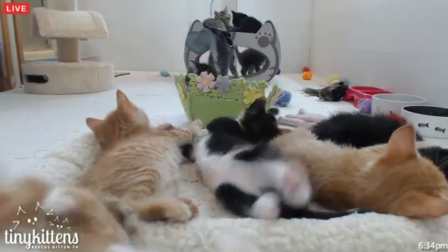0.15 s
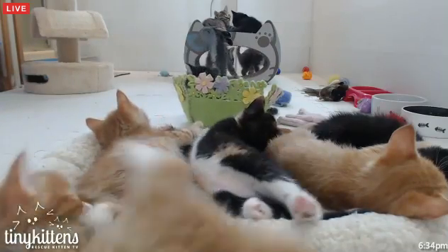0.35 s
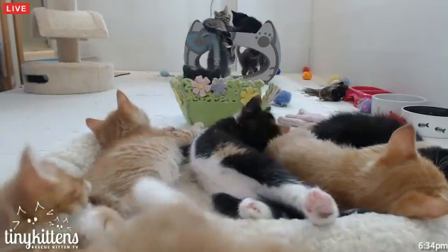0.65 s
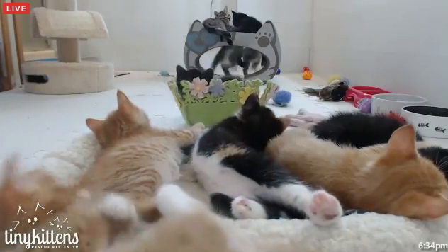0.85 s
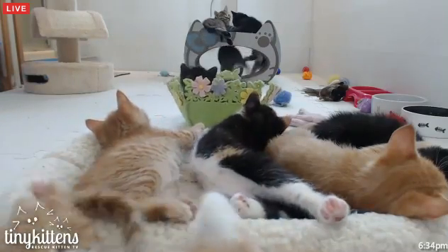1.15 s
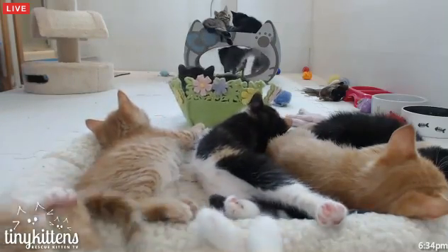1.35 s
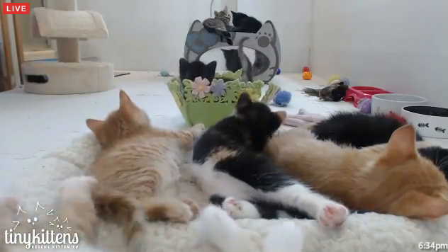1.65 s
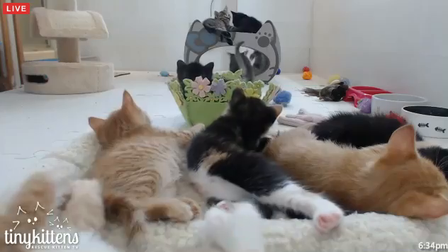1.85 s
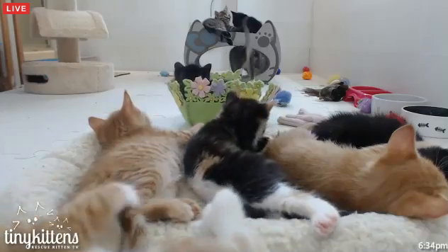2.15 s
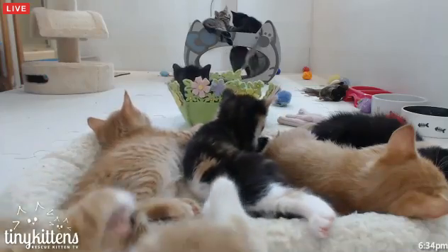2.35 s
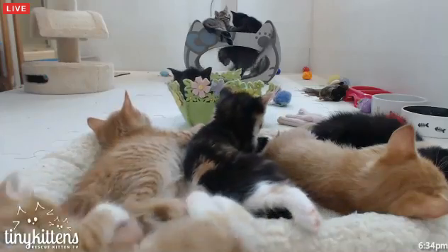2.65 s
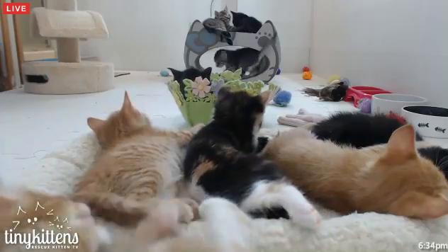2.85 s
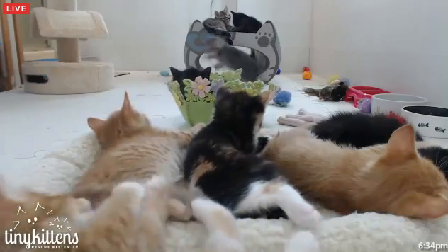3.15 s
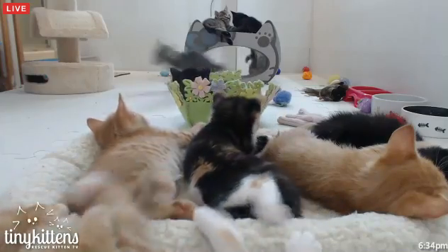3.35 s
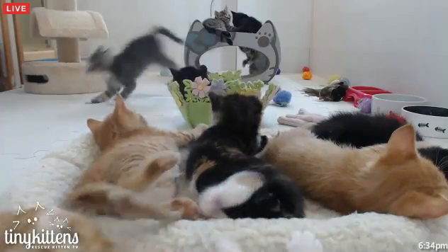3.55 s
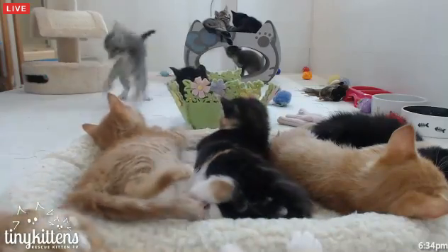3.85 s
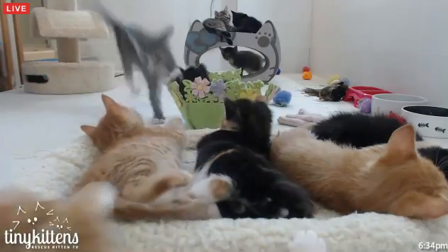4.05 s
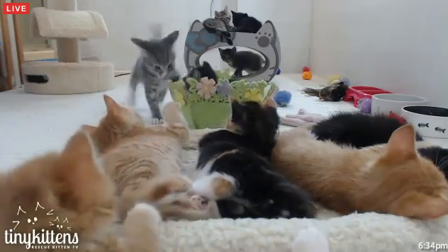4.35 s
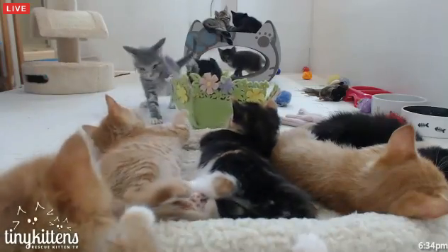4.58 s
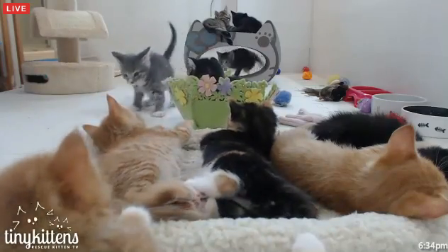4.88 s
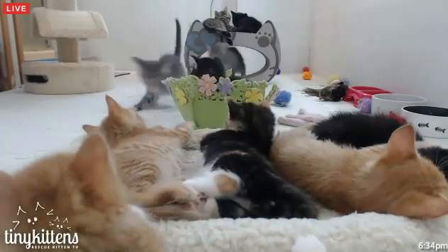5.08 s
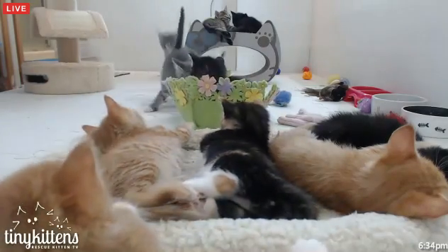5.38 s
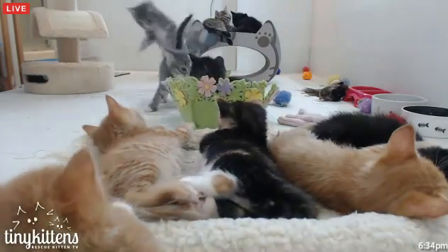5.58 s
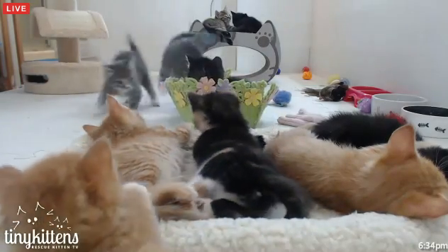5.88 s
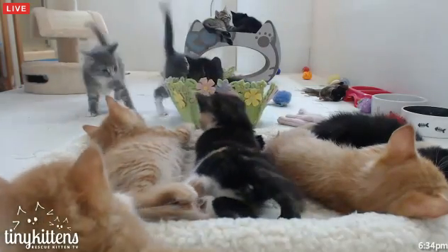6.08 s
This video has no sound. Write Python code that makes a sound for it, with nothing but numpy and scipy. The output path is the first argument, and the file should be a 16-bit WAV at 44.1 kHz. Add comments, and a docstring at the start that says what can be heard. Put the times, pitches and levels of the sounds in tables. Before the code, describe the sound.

A quiet, small, hard-surfaced room: soft air noise, low hum, a very faint high whine and pulsing buzz throughout, with fur stirring on fleece close by. A light paw lands at 0.6 s, followed by a faint scuff. From 0.95 to 1.2 s soft paws knock the microphone housing, dull and hollow, with a hard plastic claw snap at 1.05 and a rustling rub. Light pats come at 1.4 and 1.7. At 1.96 a short crash cracks at the play house; at 2.4 a longer one rattles and scrapes over a bass boom. Close bumps at 2.3, 3.0 and 3.3 lead into galloping thumps, slaps and claw ticks from 3.2 to 4.35, with brief squeaky skids. After a lull, a strong squeaky rub and clustered knocks with low thuds arrive at 4.95 to 5.4. Fur swishes; lighter steps resume, busier from 5.9 to the end, around 6 s.

```python
"""A small hard-floored room where kittens romp, over air noise, hum and a faint electronic whine.
Fur rustles on a blanket (coloured noise with wandering gains); twice something crashes about at the
play house (noise bursts, rattled modes). Another kitten bounds and skids over the floor (bursts of
noise, pitched squeaks). Nearest, one wrestles against the camera: soft presses ring the dull modes
of its housing and rock its stand, and one claw snaps on the shell."""
import sys
import numpy as np
from scipy import signal
from scipy.fft import rfft, irfft
from scipy.io import wavfile

SR = 44100
rng = np.random.default_rng(int(sys.argv[2]) if len(sys.argv) > 2 else 0)


def bounce(signal):
    """Save signal as a 16-bit WAV file at the path given by the first command-line argument."""
    frames = np.transpose(np.atleast_2d(signal))
    limited = np.clip(frames, -1, 1)
    pcm = np.round(limited * 32767).astype(np.int16)
    wavfile.write(sys.argv[1], SR, pcm)


N = 274302

# Soft paws against the camera; the levels are relative, before each layer's trim:
# start_s, ring_db, ring_hz, contact_s, shudder_db
CAMERA_BUMPS = [(.943, -18, 344, 0.0097, -21), (1.068, -20.5, 357, 0.025, -37),
                (1.112, -24.5, 380, 0.014, -16), (1.152, -18, 352, 0.014, -20),
                (2.273, -20, 361, .012, -28), (2.997, -13.5, 368.4, .017, -29.5),
                (3.279, -18.5, 350.4, 0.012, -27.5), (4.926, -25.5, 397, .007, -26),
                (4.939, -18.5, 385, 0.0063, -16.5), (4.961, -11.5, 395, 0.01, -35),
                (5.170, -13.5, 469, 0.0026, -5), (5.179, -15, 419, 0.0078, -33),
                (5.229, -14, 365, 0.015, -20.5), (5.345, -30.5, 380, 0.0098, -32),
                (5.413, -28.5, 402, 0.0053, -29)]
# Colour of a pad's slap: frequency_hz, density_db (relative, per Hz)
PAD_COLOUR = [(120, -42), (280, -5), (410, 6), (600, -6), (850, -8.5), (1200, -21), (1900, -24),
              (3500, -70)]
# Colour of claws ticking: frequency_hz, density_db (relative, per Hz)
CLAW_COLOUR = [(600, 2), (1400, 5), (2200, 1.5), (3300, 9), (4500, -1), (6400, -8), (8000, -20),
               (10000, -13.5), (13000, -18), (14500, -47)]
# Colour of a dull body rub: frequency_hz, density_db (relative, per Hz)
RUB_COLOUR = [(60, 5.5), (160, 1), (250, 2), (370, -2.5), (560, -7), (900, -12.5), (1200, -24.5),
              (2000, -30.5), (4000, -63)]
# Colour of swishing fur: frequency_hz, density_db (relative, per Hz)
SWISH_COLOUR = [(700, 7), (1500, 2.5), (2200, 1), (3200, 2), (4500, -3.5), (6300, -6.5), (8000, -15.5),
                (10000, -14.5), (13000, -23), (14500, -37)]


def amp(db):
    """Decibels to gain."""
    return 10 ** (np.asarray(db) / 20)


def evened(x):
    """Scales to rms 1."""
    return x / np.sqrt(np.mean(x ** 2) + 1e-20)


def read(points, hz):
    """Reads a table of (frequency, value) on a log-frequency axis."""
    table_hz, value = np.transpose(points)
    return np.interp(np.log(hz + 1), np.log(table_hz + 1), value)


def add(mix, start_s, sound):
    """Mixes a sound in at its start time, cut off at the end of the mix."""
    part = mix[:, round(start_s * SR):][:, :sound.shape[-1]]
    part += sound[..., :part.shape[1]]


def noise(colour, size):
    """Coloured noise at two close microphones, alike in the bass and less so in the treble."""
    # likeness of the two microphones: frequency_hz, correlation (0 to 1)
    likeness = [(30, 0.97), (120, .98), (500, 0.98), (1200, 0.84), (3000, 0.69), (6000, 0.45),
                (12000, 0.22)]
    hz = np.fft.rfftfreq(size, 1 / SR)
    mid, side = rfft(rng.standard_normal((2, size)))
    same = np.clip(read(likeness, hz), 0, .999)
    side = side * np.sqrt((1 - same) / (1 + same))
    spectrum = np.array([mid + side, mid - side]) * amp(read(colour, hz))
    return evened(irfft(spectrum, size))


def flutter(size, rate_hz, depth_db):
    """A gain of rms 1 that wanders in dB between random knots, rate_hz of them a second."""
    knots = rng.standard_normal(8192)
    position = np.arange(size) / SR * rate_hz
    wander = np.interp(position, np.arange(len(knots)), knots)
    return evened(amp(depth_db * wander))


def ring(t, hz, t60, contact):
    """A mode that swells while a soft paw presses, then dies away."""
    press = np.sin(np.pi * np.minimum(t / contact, 1)) ** 2
    loss_per_sample = amp(-60 / (t60 * SR))
    swell = signal.lfilter([1], [1, -loss_per_sample], press / press.sum())
    return swell * np.sin(2 * np.pi * hz * t)


def burst(colour, rise, hold, t60, room_db, room_t60, grain_db):
    """Grainy noise for many dense modes struck at once, with a room tail; rms 1 over its loud part."""
    t = np.arange(2 ** 15) / SR
    after = np.maximum(t - hold, 0)
    direct = amp(-60 * after / t60)
    tail = amp(room_db - 60 * after / room_t60)
    attack = 1 - np.exp(-t / rise)
    grains = flutter(len(t), rate_hz=200, depth_db=grain_db)
    sound = noise(colour, len(t)) * attack * np.hypot(direct * grains, tail)
    loud = (attack * direct) ** 2
    return sound / np.sqrt(np.sum(loud * sound ** 2) / (2 * loud.sum()))


def room_tone():
    """Air as coloured noise, hum and whine as steady sines, and a thin pulsed tone."""
    # colour of the still air: frequency_hz, density_db (relative, per Hz)
    air_colour = [(15, 3), (33, -9), (65, -0.5), (100, 4), (135, -9.5), (160, -5), (195, -25.5),
                  (240, -9.5), (450, -20), (920, -20.5), (1300, -36), (2750, -41.5), (6000, -39),
                  (10500, -45.5), (15800, -81)]
    # hum and electronic whine: pitch_hz, level_db (rms)
    steady_tones = [(48.4, -68), (2730, -79.5), (3590, -87.5), (5459, -78.5), (5491, -86.5), (5900, -102),
                    (6200, -83.5), (6401, -85.5), (6520, -84), (7171, -86), (7620, -101), (8500, -92),
                    (9491, -88.5), (9900, -102), (10541, -98)]
    t = np.arange(N) / SR
    air = amp(-49.5) * noise(air_colour, N)
    tones = np.zeros(N)
    for hz, db in steady_tones:
        tones += amp(db) * np.sqrt(2) * np.sin(2 * np.pi * (hz * t + rng.random()))
    # the tone blips once for every picture the camera takes
    buzz_hz, frame_hz = 8000, 30
    blips = np.maximum(np.cos(2 * np.pi * (frame_hz * t - .2)), 0) ** 2
    buzz = amp(-67) * blips * np.sin(2 * np.pi * buzz_hz * t)
    return air + tones + buzz


def rustle():
    """Fur drags over fleece: a faint, wavering stirring, and a swell of uneven catches per wriggle."""
    # a kitten rolls over or shoves along: start_s, length_s, rub_db, swish_db (levels at full speed)
    wriggles = [(0.186, 0.18, -48.5, -56.5), (1.052, 0.24, -37, -53.5), (3.123, .26, -43, -51),
                (3.444, 0.23, -59, -53.5), (3.62, 0.29, -62, -53), (4.952, 0.21, -45, -54.5),
                (5.244, .42, -40.5, -54), (5.914, 0.42, -38.5, -54.5)]
    peak = 0.27  # share of a wriggle spent speeding up
    # between wriggles the heap of kittens never lies quite still
    stir_rub_db, stir_swish_db = -50, -61.5
    t = np.arange(N) / SR
    rub_power, swish_power = np.zeros(N), np.zeros(N)
    for start_s, length_s, rub_db, swish_db in wriggles:
        speed = np.interp((t - start_s) / length_s, [0, peak, 1], [0, 1, 0])
        rub_power += (amp(rub_db) * speed) ** 2
        swish_power += (amp(swish_db) * speed) ** 2
    stir = flutter(N, rate_hz=30, depth_db=3.5)
    catches = flutter(N, rate_hz=40, depth_db=3.5)
    rub_gain = np.hypot(amp(stir_rub_db) * stir, np.sqrt(rub_power) * catches)
    swish_gain = np.hypot(amp(stir_swish_db) * stir, np.sqrt(swish_power) * catches)
    rub = noise(RUB_COLOUR, N) * rub_gain
    swish = noise(SWISH_COLOUR, N) * swish_gain
    return rub + swish * flutter(N, rate_hz=520, depth_db=2.0)


def house_rattle(length_s, knocks_per_s):
    """A quick volley of knocks rings the play house, a little differently at each microphone."""
    # panels and frame of the play house: pitch_hz, level_db (relative), t60_s
    house_modes = [(667, 6.5, 0.057), (702, 0, 0.09), (774, 1, 0.17), (894, 0, 0.1), (1195, -8, 0.22),
                   (1490, -35, .1), (2630, -6.5, 0.25), (2680, -21, 0.24), (3040, -19, 0.21),
                   (2990, -4.5, 0.15), (3080, -36, 0.16), (3200, -28, .1), (3680, -19, 0.16),
                   (3550, -8.5, 0.26), (5300, -19, .2), (5860, -24, .1), (6100, 2.5, 0.036),
                   (6920, -9.5, 0.17), (9700, -4, 0.052)]
    t = np.arange(SR // 2) / SR
    knocks = (rng.random(len(t)) < knocks_per_s / SR) * rng.choice([-1, 1], len(t))
    volley = knocks * np.exp(-t / length_s)
    volley[0] = 1
    modes = np.zeros((2, len(t)))
    for hz, db, t60 in house_modes:
        # a random shift in time puts high modes further out of step
        shifted = t + 3e-5 * rng.standard_normal((2, 1))
        modes += amp(db - 60 * t / t60) * np.sin(2 * np.pi * hz * shifted)
    rung = signal.fftconvolve(volley[None], modes, axes=1)[:, :len(t)]
    return rung / np.std(rung[:, :round(2 * length_s * SR)])


def crashes():
    """A crack, a rattle and a hard scrape across the room; the bass builds slowly and outlasts them."""
    # crashes at the play house: start_s, length_s, boom_db, clatter_db, scrape_db (before trims)
    crash_events = [(1.963, 0.013, -27, -32.5, -40.5), (2.397, 0.045, -27, -25.5, -30.5)]
    # colour of the bass boom: frequency_hz, density_db (relative, per Hz)
    boom_colour = [(16, 3), (26, 5), (38, -2), (60, -8), (105, 3), (160, -2), (250, -7), (330, -11),
                   (450, -13.5), (900, -67)]
    # colour of the clatter: frequency_hz, density_db (relative, per Hz)
    clatter_colour = [(100, -19), (200, 2.5), (360, -29), (500, 1.5), (680, 0), (870, 1.5), (1100, -9),
                      (1500, -13), (2300, -17), (4000, -69)]
    # colour of crack and scrape: frequency_hz, density_db (relative, per Hz)
    scrape_colour = [(800, 3.5), (1400, -21), (2100, -5), (2950, 6), (3600, -0.5), (4200, -4.5), (5200, -1),
                     (5900, -1), (6800, -1.5), (8000, -18), (9600, -5.5), (11500, -19), (13200, -20),
                     (13900, -50), (15000, -93)]
    out = np.zeros((2, N))
    to_right = amp([[-.7], [.7]])
    for start_s, length_s, boom_db, clatter_db, scrape_db in crash_events:
        crack = burst(scrape_colour, rise=0.0012, hold=0.0028, t60=0.01,
                      room_db=-18, room_t60=.1, grain_db=5)
        scrape = burst(scrape_colour, rise=0.0052, hold=length_s, t60=0.42,
                       room_db=-3, room_t60=0.35, grain_db=0.5)
        rattle = house_rattle(length_s, knocks_per_s=600)
        clatter = burst(clatter_colour, rise=0.0086, hold=length_s, t60=0.35,
                        room_db=-15, room_t60=0.34, grain_db=1.0)
        boom = burst(boom_colour, rise=0.011, hold=length_s + 0.041, t60=0.45,
                     room_db=-25, room_t60=0.74, grain_db=-0.5)
        add(out, start_s + 0.0014, amp(scrape_db) * crack)
        add(out, start_s, amp(scrape_db - 1) * to_right * scrape)
        add(out, start_s + .002, amp(clatter_db - 6.0) * rattle)
        add(out, start_s, amp(clatter_db - 4) * clatter)
        add(out, start_s, amp(boom_db) * boom)
    return out


def paws():
    """Each landing: claws tick at once, the pad slaps, and the floor's thump is slowest to rise."""
    # paws and bodies landing: start_s, pat_db, thump_db, claw_db (before trims), thump_hz
    steps = [(.585, -39, -38, -55, 99), (1.427, -35.5, -36.5, -68, 92.5), (1.469, -34, -36, -70.5, 99),
             (1.713, -31, -39, -50, 105), (3.197, -24.5, -37, -36.5, 106), (3.276, -12, -29, -51, 210),
             (3.4, -21, -31, -41.5, 128), (3.465, -21.5, -37.5, -45, 163), (3.506, -29.5, -27.5, -37, 223),
             (3.548, -26.5, -32, -47, 185), (3.676, -28, -31.5, -39.5, 184), (3.704, -25, -34, -40, 190),
             (3.889, -30, -36, -48.5, 184), (3.985, -49, -52, -44.5, 128), (4.153, -32.5, -40, -52, 114),
             (4.211, -26, -44, -43, 198), (4.281, -20, -28.5, -35, 133), (4.302, -35, -25, -35, 165),
             (4.343, -52, -29, -43.5, 97), (5.381, -46, -36, -53, 252), (5.49, -29, -37.5, -47, 273),
             (5.704, -34.5, -39, -72, 135), (5.875, -24, -34, -50.5, 158), (5.915, -29, -38.5, -43.5, 114),
             (5.96, -21, -31.5, -34.5, 176), (6.016, -39, -35, -40.5, 167), (6.138, -40, -31, -43.5, 119)]
    # colour of the floor's thump: multiple of thump_hz, density_db (relative, per Hz)
    thump_shape = [(.2, -23.5), (.45, 0), (.7, -10), (1, 5), (1.4, -10.5), (2.2, -16.5), (4, -69)]
    out = np.zeros((2, N))
    for start_s, pat_db, thump_db, claw_db, hz in steps:
        thump_colour = [(hz * multiple, db) for multiple, db in thump_shape]
        tick = burst(CLAW_COLOUR, rise=0.00017, hold=0.0029, t60=0.015,
                     room_db=-7.5, room_t60=0.29, grain_db=3.5)
        slap = burst(PAD_COLOUR, rise=0.00092, hold=0.0066, t60=0.093,
                     room_db=-11.0, room_t60=0.38, grain_db=-1.5)
        thump = burst(thump_colour, rise=0.0039, hold=0.014, t60=0.093,
                      room_db=-11, room_t60=0.32, grain_db=-1)
        add(out, start_s, amp(claw_db - 6) * tick)
        add(out, start_s, amp(pat_db - 14) * slap)
        add(out, start_s, amp(thump_db - 2.5) * thump)
    return out


def scuffs():
    """A skidding paw sticks and slips: noise around one pitch squeaks while its fur swishes."""
    # paws and claws skidding: start_s, length_s, squeak_db, squeak_hz, swish_db (before the swell)
    skids = [(.785, 0.092, -46.5, 690, -85), (1.059, 0.098, -41.5, 1030, -64),
             (1.371, 0.058, -47, 660, -53.5), (1.799, 0.12, -48, 560, -51), (1.919, 0.057, -47, 770, -54.5),
             (3.309, .03, -43, 1000, -72), (3.411, 0.029, -49.5, 1700, -58), (3.455, 0.032, -41, 800, -62),
             (4.072, 0.023, -51.5, 765, -50), (4.209, 0.016, -42, 716, -53), (4.275, 0.057, -37, 730, -50),
             (4.95, .03, -28.5, 700, -51.5), (5.549, 0.048, -39, 895, -49.5),
             (5.873, 0.038, -42.5, 910, -62), (6.068, 0.036, -33.5, 740, -69)]
    # colour of a squeak: multiple of squeak_hz, density_db (relative, per Hz)
    squeak_shape = [(.25, -30.5), (.6, 1.5), (.85, 1), (1, 2), (1.15, -4), (1.5, -16), (3, -29.5),
                    (6, -64.5)]
    out, t = np.zeros((2, N)), np.arange(SR // 2) / SR
    for start_s, length_s, squeak_db, hz, swish_db in skids:
        stroke = np.sin(np.pi * np.minimum(t / length_s, 1)) ** 2
        echo = signal.lfilter([1], [1, -amp(-60 / (.18 * SR))], stroke)  # 0.18 s decay, as power
        swell = np.sqrt(stroke + amp(-19.5) * echo / echo.max())
        squeak = noise([(hz * multiple, db) for multiple, db in squeak_shape], len(t))
        swish = noise(SWISH_COLOUR, len(t)) * flutter(len(t), rate_hz=960, depth_db=2.0)
        add(out, start_s, swell * (amp(squeak_db) * squeak + amp(swish_db) * swish))
    return out


def claw_snap():
    """One hard tick rings the camera's plastic shell; the room returns it and the paw drags on."""
    # modes of the shell: pitch_hz, level_db (relative), t60_s
    shell_modes = [(1450, -3.5, 0.027), (1660, 0, 0.016), (2170, -23, 0.013), (2720, -3.5, 0.019),
                   (2950, 2, 0.014), (3280, -43, .015), (4340, -26, .01), (6550, -17, 0.0084),
                   (9900, -19, 0.0045), (12800, -14, 0.0038)]
    out, t = np.zeros((2, N)), np.arange(SR // 3) / SR
    start_s, db = 1.0503, -26
    shell = sum(amp(level_db) * ring(t, hz, t60, contact=0.00022) for hz, level_db, t60 in shell_modes)
    tick = amp(db) * shell
    room_t60, room_db = .33, -2
    echoes = rng.standard_normal((2, len(t))) * amp(-60 * t / room_t60) * (t > .004)
    echoes /= np.linalg.norm(echoes[0])
    scratch = burst(CLAW_COLOUR, rise=0.00022, hold=0.0024, t60=.02,
                    room_db=-24, room_t60=.3, grain_db=4)
    drag = burst(PAD_COLOUR, rise=0.0019, hold=0.032, t60=0.16,
                 room_db=-9, room_t60=0.3, grain_db=-0.5)
    add(out, start_s, tick)
    add(out, start_s, amp(room_db) * signal.fftconvolve(tick[None], echoes, axes=1))
    add(out, start_s, amp(db - 18.5) * scratch)
    add(out, start_s, amp(db - 9.0) * drag)
    return out


def stand_shudders():
    """The weight behind each bump rocks the camera stand in a short low thud, with little below 68 Hz."""
    lag_s, push_s = 0.01436, 0.022  # the stand gives way just after each bump
    pitch_at_0_db_hz, sag_hz_per_db = 86.7, 0.58  # it sways lower under a heavier push
    out, t = np.zeros((2, N)), np.arange(SR // 2) / SR
    for start_s, _, _, _, db in CAMERA_BUMPS:
        hz = pitch_at_0_db_hz - sag_hz_per_db * db
        sway = ring(t, hz, 0.11, push_s) + amp(-20) * ring(t, 110, 0.58, push_s)
        add(out, start_s + lag_s, amp(db) * sway)
    low_cut = signal.butter(4, 68, "high", fs=SR, output="sos")
    return signal.sosfiltfilt(low_cut, out)


def camera_bumps():
    """A paw presses the housing's main mode; its first touch and grainy drag wake the overtones."""
    # overtones of the housing: pitch_hz, level_db (relative), t60_s
    housing_modes = [(529.2, -5, 0.12), (594, -11, 0.069), (669, -16.5, 0.086), (810, -16.5, 0.14),
                     (887, -20.5, 0.15), (1063, -35, 0.11), (1250, -62.5, 0.052), (1373, -27, 0.046),
                     (1900, -36, 0.11)]
    # a quicker touch wakes more overtones: level at the usual contact, gain for each halving of it
    usual_contact_s, usual_db, brighter_db = .01, -4, 5.5
    out, t = np.zeros((2, N)), np.arange(SR // 2) / SR
    overtones = np.zeros(len(t))
    for hz, level_db, t60 in housing_modes:
        overtones += amp(level_db - 60 * t / t60) * np.sin(2 * np.pi * hz * t)
    pad = signal.butter(2, 1000, fs=SR, output="sos")  # a soft pad passes little above 1000 Hz
    for start_s, db, hz, contact, _ in CAMERA_BUMPS:
        overtones_db = usual_db + brighter_db * np.log2(usual_contact_s / contact)
        grains = rng.standard_normal(len(t)) * (t / contact) * np.exp(-1.5 * t / contact)
        drive = amp(-4) * grains / np.linalg.norm(grains)
        drive[0] += amp(-7)  # first touch
        upper = signal.sosfilt(pad, signal.fftconvolve(drive, overtones)[:len(t)])
        main = ring(t, hz, 0.1, contact) + amp(-20.5) * ring(t, 358.6, 0.36, contact)
        # the pad rubs faintly over the housing, with a short tail
        drag = burst(RUB_COLOUR, rise=.002, hold=contact, t60=.1, room_db=-6, room_t60=.3, grain_db=3)
        add(out, start_s, amp(db) * main)
        add(out, start_s + 0.0011, amp(db + overtones_db) * upper)
        add(out, start_s, amp(db + overtones_db - 18) * drag)
    return out


def scene():
    """Everything in the room, from the background to the bumped camera."""
    background = room_tone() + rustle() + crashes()
    floor = paws() + scuffs()
    camera = claw_snap() + stand_shudders() + camera_bumps()
    return background + floor + camera


def record(dry):
    """The right microphone is a little stronger in the bass, the left in the top; then the band limit."""
    # balance of the microphones: frequency_hz, tilt_db (right gains it, left loses it)
    balance = [(30, 1), (150, 0.73), (500, 0.46), (1200, 0), (4000, 0.1), (12000, -0.6)]
    edge_hz = 15750
    tilt_db = read(balance, np.fft.rfftfreq(N, 1 / SR))
    heard = irfft(rfft(dry) * amp(np.array([-tilt_db, tilt_db])), N)
    band_limit = signal.firwin(511, edge_hz, window=("kaiser", 9), fs=SR)
    return signal.oaconvolve(heard, band_limit[None], "same")


dry = scene()
out = record(dry)
bounce(out)
```